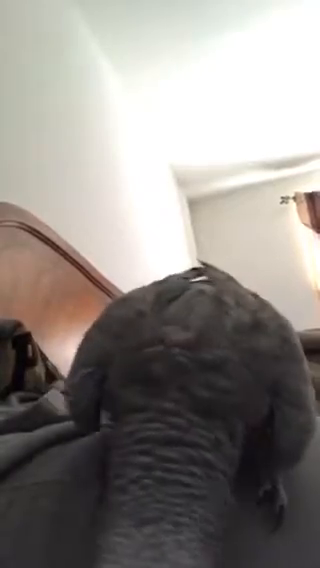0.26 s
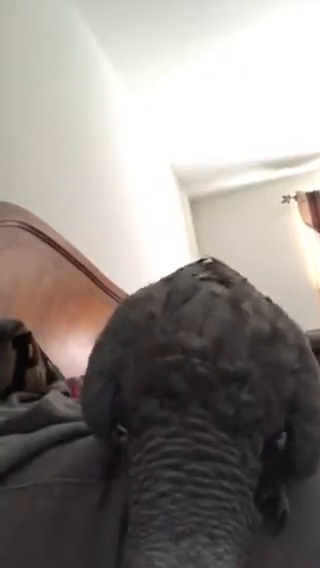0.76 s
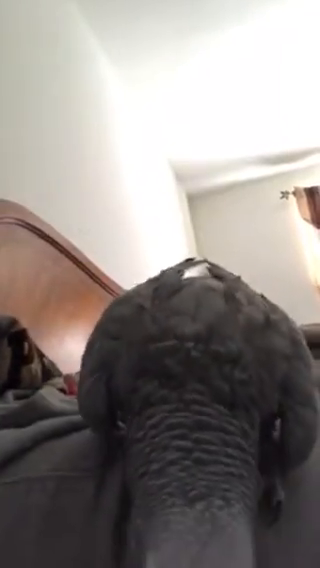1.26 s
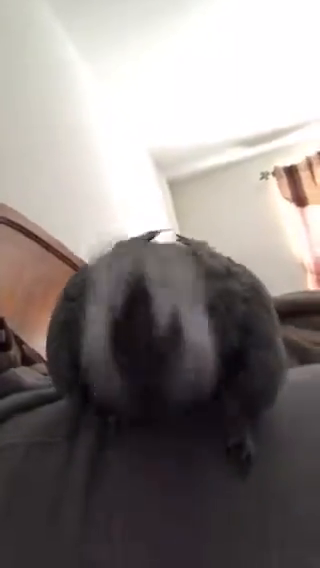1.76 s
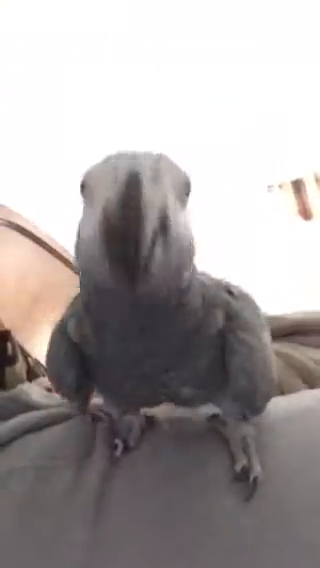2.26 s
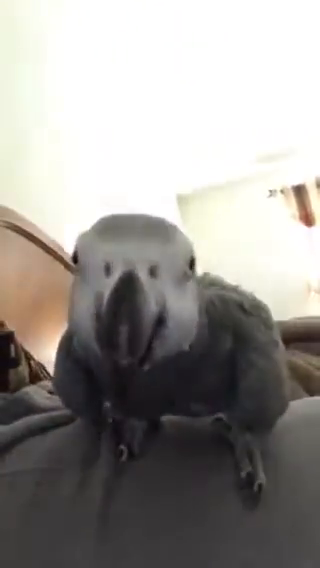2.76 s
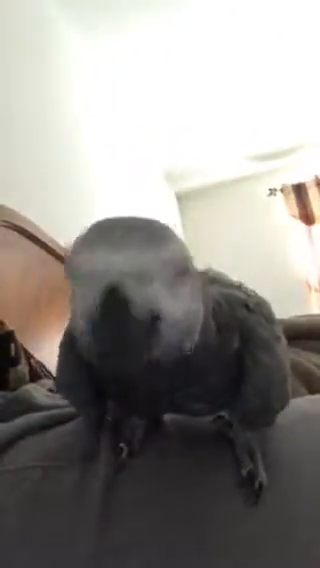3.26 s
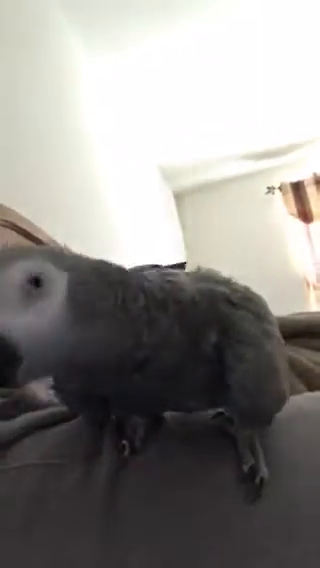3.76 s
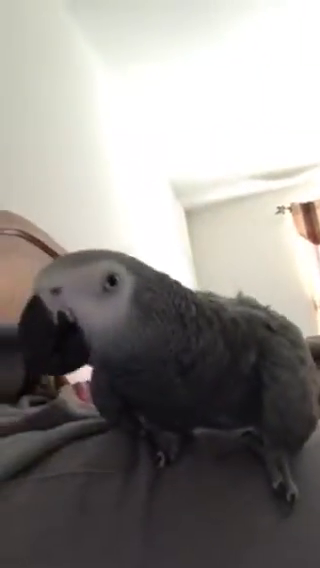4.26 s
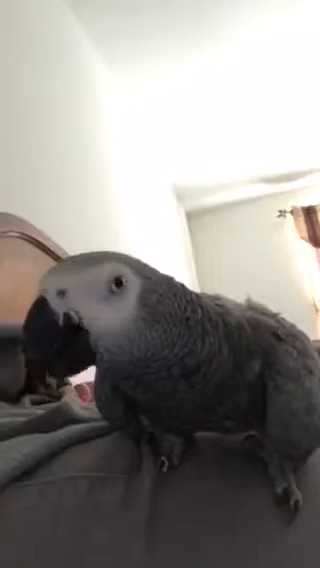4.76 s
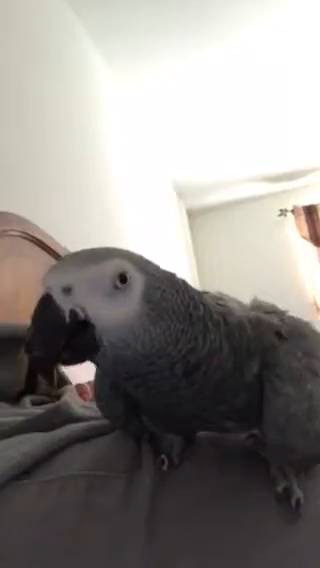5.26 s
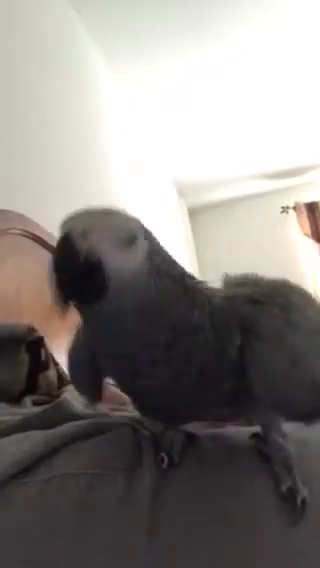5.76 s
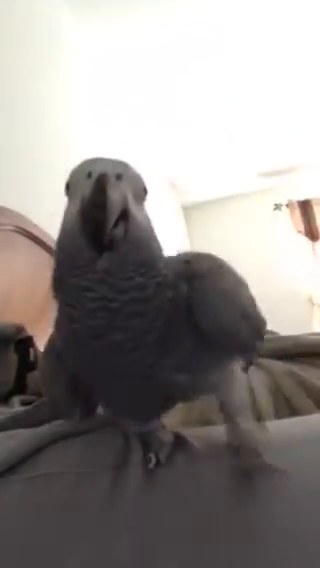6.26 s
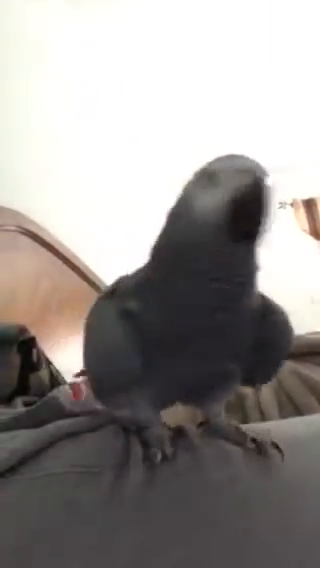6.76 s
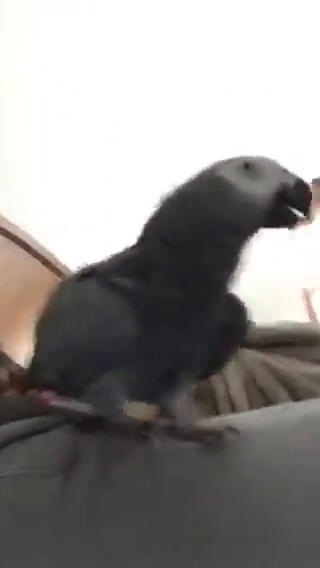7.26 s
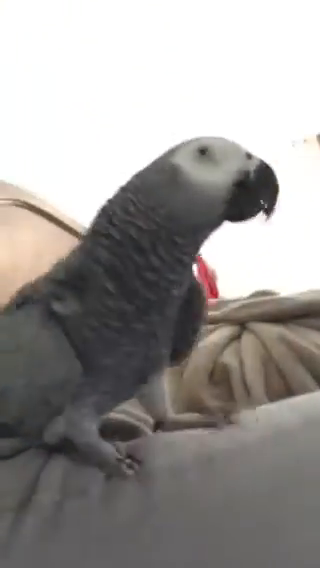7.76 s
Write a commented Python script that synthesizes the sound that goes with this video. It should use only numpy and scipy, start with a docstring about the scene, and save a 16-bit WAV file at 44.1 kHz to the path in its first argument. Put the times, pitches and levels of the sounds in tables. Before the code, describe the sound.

A parrot close to the microphone clicks its beak and tongue and makes tiny squeaky clucks, many ending in a little puff of hiss, with faint feather rustles. About halfway through comes a soft raspy chirp. Near the end one loud, short squawk falls in pitch, followed by a few faint clicks and clucks. Both calls ring slightly in the quiet bedroom.

```python
"""A grey parrot, close by in a bedroom, clicks its beak and tongue and makes tiny squeaky clucks.
The clucks are pulses from its voice box. Air builds up behind the tongue, so most runs of clucks end
in a puff of hiss. There are also feather rustles and two faint, short wet squeaks. Two calls ring
through the room, perhaps from a second bird further off: a soft raspy chirp and, near the end,
one loud falling squawk."""
import sys
import numpy as np
from scipy import signal
from scipy.fft import rfft, irfft, next_fast_len
from scipy.io import wavfile

SR = 44100
rng = np.random.default_rng(int(sys.argv[2]) if len(sys.argv) > 2 else 0)


def transcribe(u):
    """Save the signal u as a 16-bit wav file named by the first command-line argument.

    u: samples, shape (n,) or (channels, n), limited to [-1, 1]; the rate is SR.
    q: integer samples, one column per channel.
    """
    v = np.clip(np.atleast_2d(u).T, -1, 1)
    q = np.round(v * 32767).astype(np.int16)
    wavfile.write(sys.argv[1], SR, q)


N = 353682
TIME = np.arange(N) / SR
CUTOFF_HZ = 16100


def from_db(db):
    """Turn decibels into a number to multiply by."""
    return 10 ** (np.asarray(db) / 20)


def rms_one(x):
    """Scale a signal so its average strength (rms) is 1."""
    return x / np.sqrt(np.mean(x ** 2) + 1e-20)


def at_hz(points, hz):
    """Look up a frequency in a table, sliding between rows on a musical scale."""
    table = np.array(points)
    return np.interp(np.log(np.maximum(hz, 1)), np.log(table[:, 0]), table[:, 1])


def add(track, start_s, sound):
    """Mix a sound into a track at a given time."""
    at = max(round(start_s * SR), 0)
    track[at:at + len(sound)] += sound[:N - at]


def colour(x, spectrum):
    """Turn each frequency up or down as a table says."""
    size = next_fast_len(N + 2000)
    bins = rfft(x, size)
    return irfft(bins * from_db(at_hz(spectrum, np.arange(len(bins)) * SR / size)), size)[:N]


def noise(spectrum):
    """Steady noise with a given tone colour and strength 1."""
    return rms_one(colour(rng.standard_normal(N), spectrum))


def flutter(rate_hz):
    """A random wobble of strength 1, up to about the given speed."""
    smoothing = signal.butter(2, rate_hz, fs=SR, output="sos")
    return rms_one(signal.sosfilt(smoothing, rng.standard_normal(N)))


def resonate(x, hz, width_hz):
    """Make a sound ring at one frequency; a narrower width rings longer."""
    r = np.exp(-np.pi * width_hz / SR)
    feedback = [1, -2 * r * np.cos(2 * np.pi * hz / SR), r * r]
    return signal.lfilter(np.array([1, 0, -1]) * (1 - r * r) / 2, feedback, x)


def peak(hz, centre_hz, width_hz):
    """A bell shape that reaches 1 at its centre."""
    return 1 / (1 + ((hz - centre_hz) / width_hz) ** 2)


def arch(length_s, power, skew=1):
    """A swell that rises and falls; a skew below 1 makes it peak early."""
    progress = np.linspace(0, 1, round(length_s * SR))
    return np.abs(np.sin(np.pi * progress ** skew)) ** power


# The tone of the quiet room. Each row: frequency in Hz, relative level in dB.
BACKGROUND_COLOUR = [(15, -35.5), (25, -23.5), (40, -1.5), (53, -0.5), (166, -7.5), (195, -10.5), (242, -6),
                     (344, -13), (624, -19.5), (775, -18), (2990, -26.5), (3620, -28), (4740, -28.5),
                     (7920, -31), (11300, -37), (16000, -33.5)]

def background(level_db=-67.5):
    """A faint, low rush fills the bedroom the whole time."""
    return from_db(level_db) * noise(BACKGROUND_COLOUR)


# Beak and tongue clicks. Each row: start in seconds, ring level in dB, beak ring in Hz,
# mouth pop in Hz, snap level in dB.
CLICKS = [(0.1402, -50, 980, 810, -53), (0.211, -50, 1120, 1050, -61), (0.3755, -46.5, 1220, 380, -49),
          (0.6546, -44, 1100, 717, -57.5), (0.948, -55.5, 1720, 368, -58.5), (1.11, -56, 1730, 280, -58),
          (1.5546, -54, 2300, 420, -73), (1.794, -51, 1040, 724, -54.5), (1.9597, -79, 3190, 950, -52),
          (2.0317, -53, 2230, 650, -62), (2.0688, -52.5, 1121, 950, -54), (2.2703, -64, 1670, 1310, -64.5),
          (2.419, -72, 1700, 1300, -68), (2.4656, -52.5, 1600, 1480, -50.5), (2.656, -64.5, 1150, 950, -63),
          (2.7355, -44, 2980, 900, -46.5), (3.0088, -65, 3000, 720, -61), (3.282, -61, 1470, 950, -60),
          (3.5519, -54, 1170, 770, -84), (3.7408, -69, 1200, 540, -64), (4.14, -62.5, 2490, 950, -67),
          (4.4566, -46.5, 2570, 870, -58), (4.773, -47.5, 2340, 850, -75), (5.1957, -45, 2090, 970, -48.5),
          (5.5501, -58, 1090, 990, -61.5), (6.844, -58.5, 1050, 860, -77), (7.4698, -56.5, 1840, 940, -67),
          (7.9379, -56.5, 1170, 294, -70)]
# The high notes in the beak's hard snap. Each row: frequency in Hz, width in Hz, relative level in dB.
SNAP_NOTES = [(3500, 1100, -3), (6700, 1000, 0), (11000, 4000, -8)]

def clicks(beak_cutoff_hz=7600, leak_share=0.35):
    """The tongue lets go: the beak snaps and rings, and the mouth pops a little longer."""
    out, kick = np.zeros(N), signal.unit_impulse(SR // 25)
    scale = np.sqrt(0.004 * SR / len(kick))   # levels count as if each click lasted 4 ms

    def struck(hz, width_hz):
        return rms_one(resonate(resonate(kick, hz, width_hz), hz, 2 * hz))

    for start, ring_db, ring_hz, pop_hz, snap_db in CLICKS:
        pop = struck(pop_hz, width_hz=90)
        pop_db = ring_db - 2.5 - 3.5 * np.log2(pop_hz / 328)   # a roomier mouth pops harder
        crack = struck(2100, width_hz=1900)
        # the tongue sits differently each time, which moves a hollow note
        hollow_hz = 1900 * from_db(rng.normal(0, 1.5))
        hollow = rms_one(resonate(kick, hollow_hz, width_hz=350))
        ring = rms_one(struck(ring_hz, width_hz=420) + 0.42 * crack + 0.46 * hollow)
        snap = 0
        for hz, width, db in SNAP_NOTES:
            note = resonate(resonate(kick, hz, width), hz, 2 * width)
            snap += from_db(db + rng.normal(0, 3.2)) * note
        click = from_db(pop_db) * pop + from_db(ring_db) * ring + from_db(snap_db) * rms_one(snap)
        add(out, start, scale * click)
    # the closed beak lets only part of the highest treble out
    muffled = signal.sosfilt(signal.butter(8, beak_cutoff_hz, fs=SR, output="sos"), out)
    return (1 - leak_share) * muffled + leak_share * np.roll(out, 5)


# Low clucks. Each row: start in seconds, length in seconds, pitch in Hz, level of the base note in dB,
# level of the overtones (the higher notes above it) in dB.
GRUNTS = [(0.15, 0.017, 540, -58, -62), (0.164, 0.016, 690, -49, -72.5), (0.412, 0.039, 299, -55, -70),
          (3.614, .048, 439, -53, -57), (3.9, 0.045, 583, -50.5, -55), (4.455, .1, 619.5, -52.5, -55.5),
          (5.119, .027, 361, -76, -54.5), (5.15, 0.049, 392, -69, -56), (5.613, 0.021, 375, -76, -58.5),
          (7.016, 0.042, 301.4, -51, -66)]

def grunts(bend=(0.93, 0.97, 0.88), bright_db=-15):
    """A grunt holds a nearly level note; the bend multiplies its start, middle and end pitch."""
    for start, length, hz, base_db, overtone_db in GRUNTS:
        yield start, length, hz * np.array(bend), base_db, overtone_db, bright_db


# Falling clucks. Each row: start in seconds, length in seconds, middle pitch in Hz, end pitch in Hz,
# level in dB, brightness in dB.
GULPS = [(1.562, 0.035, 403, 190, -50.5, -14.5), (2.039, 0.023, 394, 195, -54.5, -6.5),
         (2.542, 0.031, 490.4, 170, -45, -11.5), (2.813, .023, 736, 385, -43, -1.5),
         (3.078, .026, 802, 463, -41, -12.5), (3.34, .025, 601, 312, -45.5, -9),
         (3.929, .025, 386, 239, -53, -9), (4.254, .027, 410, 275, -48.5, -15),
         (4.519, .056, 535.5, 383, -49, -7), (4.875, .035, 515, 200, -46.5, -16),
         (5.711, .021, 586, 372, -46.5, -1.5), (5.927, .03, 489, 360, -52, -4.5),
         (6.197, 0.021, 560, 476, -58, 3)]

def gulps():
    """A gulp plunges in pitch; deeper gulps have weaker overtones."""
    for start, length, hz, end_hz, base_db, bright_db in GULPS:
        overtone_db = base_db - 4.5 + 4 * np.log2(hz / 570)
        yield start, length, (1.38 * hz, hz, end_hz), base_db, overtone_db, bright_db


# High clucks. Each row: start in seconds, length in seconds, pitch in Hz, level in dB, brightness in dB.
PEEPS = [(2.523, 0.019, 790, -50, -16), (2.765, .024, 674, -42, -2.5), (2.794, .023, 765, -44.5, 0),
         (3.055, .021, 774, -41.5, -11), (3.322, 0.018, 667, -42.5, -12.5), (4.22, 0.02, 684, -45.5, -12.5),
         (5.431, 0.018, 870, -47.5, -10.5), (5.678, .016, 830, -43.5, -0.5), (5.902, .019, 749, -44, -9.5),
         (6.138, 0.021, 708, -43, -9), (6.173, .021, 710, -45.5, -4), (6.37, .022, 750, -44, -16),
         (6.403, 0.03, 740, -43, -7.5), (6.442, 0.027, 727, -42.5, -2), (6.687, 0.019, 849, -36, -1),
         (6.721, .03, 1047, -54.5, -1), (7.256, 0.023, 822, -46.5, -13), (7.502, .021, 700, -58, -13),
         (7.566, .02, 778, -46, -16)]

def peeps(bend=(1.12, 0.99, 1.333)):
    """A peep dips in pitch, then flicks upwards."""
    for start, length, hz, base_db, bright_db in PEEPS:
        yield start, length, hz * np.array(bend), base_db, base_db - 4.5, bright_db


# How the mouth colours overtones and breath. Each row: frequency in Hz, relative level in dB.
MOUTH_COLOUR = [(400, 2.5), (1400, -4.5), (2300, -3.5), (3600, 2), (5000, -19.5), (6700, -5.5), (8200, -24),
                (15000, -32)]
BREATH_COLOUR = [(300, -18.5), (1000, 5), (2400, 2), (3900, 4), (5300, -0.5), (6700, 6.5), (8500, -16.5),
                 (16000, -33.5)]

def clucks(shapes, jitter=0.019, wander=0.035, rasp=0.078, croak_below_hz=650):
    """Each grunt, gulp or peep is a short run of voice box pulses whose pitch bends along one arc."""
    out, wobble, shake = np.zeros(N), flutter(660), flutter(430)
    breath, waver = noise(BREATH_COLOUR), flutter(45)
    harmonic = np.arange(1, 25)[:, None]
    for start, length, (start_hz, middle_hz, end_hz), base_db, overtone_db, bright_db in shapes:
        progress = np.linspace(0, 1, round(length * SR))
        span = round(start * SR) + np.arange(len(progress))
        arc = np.polyval(np.polyfit([0, 0.5, 1], [start_hz, middle_hz, end_hz], 2), progress)
        # at low pitch the voice box is slack and beats unevenly
        croak = np.clip(2 * (1 - arc / croak_below_hz), 0, 1)
        pitch = arc * (1 + jitter * (1 + 2 * croak) * wobble[span])
        pitch *= 1 + wander * croak * waver[span]
        phase = 2 * np.pi * np.cumsum(pitch) / SR
        hz = harmonic * arc
        # an open beak lets the upper overtones out; the tongue boosts those near twice the pitch
        beak_db = bright_db * np.interp(hz, [2300, 3200], [0, 1])
        tongue_db = 7 * peak(hz, 2.05 * middle_hz, width_hz=260)
        level_db = overtone_db + at_hz(MOUTH_COLOUR, hz) + beak_db + tongue_db + 4 * croak * shake[span]
        # the throat boosts a low base note; a little higher lies a weak spot
        level_db[0] = base_db + 8 * peak(arc, 310, width_hz=90)
        level_db -= 9 * peak(hz, 515, width_hz=50)
        # the throat delays each overtone differently
        lag = np.cumsum(rng.normal(0.5, 0.8, harmonic.shape), axis=0)
        tone = np.sum(from_db(level_db) * (hz < CUTOFF_HZ) * np.cos(harmonic * phase - lag), axis=0)
        rush = rasp * from_db(overtone_db) * breath[span] * (1 + np.cos(phase))
        # a falling cluck is let go suddenly, so it peaks early
        fall = np.clip(1 - end_hz / start_hz, 0, 1)
        add(out, start, (tone + rush) * arch(length, 0.73, skew=np.exp(-0.2 * fall)))
    return out


# The thin, high sizzle of escaping air. Each row: frequency in Hz, relative level in dB.
SIZZLE_COLOUR = [(5000, -20), (8000, 0), (10000, -2), (11800, 7.5), (14000, -3), (16000, -8)]

def air_leak(shapes, lead_s=0.019, sputter_db=2.5):
    """Air squeezes past the tongue as pressure builds for each cluck; the nearest puff sets its level."""
    strength = np.zeros(N)
    for start, length, *_ in shapes:
        leak_db = min(PUFFS, key=lambda puff: abs(puff[0] - start))[-1]
        swell = arch(length + lead_s, 1.1)
        add(strength, start - lead_s, from_db(leak_db) * swell * np.linspace(0, 2, len(swell)))
    return strength * rms_one(noise(SIZZLE_COLOUR) * from_db(sputter_db * flutter(300)))


# Puffs that end the runs of clucks. Each row: start in seconds, length in seconds, hiss level in dB,
# sizzle level in dB, level in dB of the air that leaks during nearby clucks.
PUFFS = [(0.183, 0.055, -63.5, -63, -75), (0.433, .038, -63.5, -78, -59), (1.267, 0.04, -62.5, -74, -80),
         (1.593, 0.021, -57, -68, -59.5), (1.865, .027, -72, -71, -80), (2.061, .014, -55, -68, -61),
         (2.558, .028, -54, -57.5, -82), (2.824, .04, -48.5, -55, -82), (3.094, 0.042, -52.5, -54, -73),
         (3.349, 0.047, -55, -52, -66), (3.65, 0.034, -57, -50.5, -52.5), (3.94, .04, -57, -56.5, -63),
         (4.258, 0.022, -66, -60.5, -68), (4.535, .061, -54, -55, -75), (4.892, .028, -72, -63, -69),
         (5.182, 0.029, -58.5, -60, -51.5), (5.609, .028, -60.5, -76, -72.5),
         (5.717, .038, -53.5, -63.5, -71), (5.949, .044, -59, -62.5, -56), (6.209, 0.03, -53, -61.5, -62.5),
         (6.443, 0.077, -46.5, -51.5, -68), (6.703, 0.069, -61.5, -66, -68), (6.76, .04, -57, -61, -72),
         (7.272, .078, -55.5, -56, -53.5), (7.52, 0.16, -70.5, -65.5, -63), (7.857, 0.033, -63.5, -70, -80)]

def puffs(sputter_db=2.5, throat_hz=3890):
    """Air sputters out as the beak opens and the throat rings; the sizzle peaks before the hiss."""
    out = np.zeros(N)
    sputter = rms_one(from_db(sputter_db * flutter(300)))
    breath = noise(BREATH_COLOUR)
    hiss = sputter * rms_one(breath + 0.67 * resonate(breath, throat_hz, width_hz=410))
    sizzle = sputter * noise(SIZZLE_COLOUR)
    for start, length, hiss_db, sizzle_db, _ in PUFFS:
        span = round(start * SR) + np.arange(round(length * SR))
        add(out, start, from_db(hiss_db) * rms_one(arch(length, 1.1, skew=0.71)) * hiss[span])
        add(out, start, from_db(sizzle_db) * rms_one(arch(length, 1.1, skew=0.41)) * sizzle[span])
    return out


# Feather rustles, plus two faint, short wet squeaks at 5.088 and 5.457 seconds.
# Each row: start in seconds, length in seconds, level in dB, centre in Hz.
RUSTLES_AND_SQUEAKS = [(0.37, 0.085, -64, 6700), (1.063, .15, -69, 11000), (1.233, 0.043, -52, 10300),
                       (2.21, 0.064, -72, 11800), (2.29, .095, -69, 6000), (3.848, .072, -66, 11200),
                       (4.816, .06, -68, 6900), (5.088, .014, -58, 14000), (5.457, .028, -69, 3800),
                       (6.347, 0.16, -59.5, 4900), (6.815, 0.1, -65.5, 3250), (7.7, .22, -68.5, 9840)]
# The tone of the grainy noise they share. Each row: frequency in Hz, relative level in dB.
GRAIN_COLOUR = [(600, -23.5), (1500, 4), (4000, -4), (9500, -3), (16000, -1.5)]

def rustles_and_squeaks():
    """Feather rustles and two faint wet squeaks, each a short swell of grainy noise."""
    out = np.zeros(N)
    grains = noise(GRAIN_COLOUR) * from_db(4 * flutter(250))
    for start, length, level_db, hz in RUSTLES_AND_SQUEAKS:
        swell = arch(length, 0.77)
        band = resonate(grains[round(start * SR):][:len(swell)], hz, width_hz=0.36 * hz)
        add(out, start, from_db(level_db) * swell * rms_one(band))
    return out


def call(course, throat, jitter, shimmer_db, rasp_db, dulling):
    """A shrill voice shaped by the throat; roughness shakes its pitch and its loudness."""
    times, *columns = np.transpose(course)
    pitch, level_db, roughness = (np.interp(TIME, times, column) for column in columns)
    span = (TIME > times[0]) & (TIME < times[-1])
    shaky_pitch = pitch * (1 + jitter * roughness * flutter(600))
    phase = 2 * np.pi * np.cumsum(shaky_pitch[span]) / SR
    harmonic = np.arange(1, 9)[:, None]
    # less effort makes the voice duller
    tilt_db = dulling * (harmonic - 4) * (level_db[span] - level_db.max())
    strengths = from_db(tilt_db) * (harmonic * pitch[span] < CUTOFF_HZ)
    voice = from_db(rasp_db) * rng.standard_normal(N) * span
    voice[span] += np.sum(strengths * np.sin(harmonic * phase), axis=0)
    shake_db = shimmer_db * roughness * np.tanh(flutter(220))
    return colour(voice * from_db(level_db + shake_db), throat)


# The chirp's path. Each row: time in seconds, pitch in Hz, level in dB, roughness from 0 to 1.
CHIRP_COURSE = [(4.272, 2040, -60, .05), (4.312, 1840, -51.5, 0.24), (4.335, 2210, -50, 0.98),
                (4.362, 2734, -37, 0), (4.388, 2660, -57, .7), (4.435, 2280, -49, 1),
                (4.475, 2726, -44, 0.59), (4.525, 2484, -53, .85), (4.555, 2254, -63, .9)]
# How the throat colours the chirp. Each row: frequency in Hz, level change in dB.
CHIRP_THROAT = [(1450, -22), (1850, -5.5), (2300, -6.5), (2780, 0), (3150, -20), (3800, -7.5), (4400, -17),
                (5300, -26), (8000, -29), (12000, -47)]

def chirp():
    """A soft, raspy call starts low and clean, then breaks upwards and swells twice."""
    return call(CHIRP_COURSE, CHIRP_THROAT, jitter=0.124, shimmer_db=9.5, rasp_db=-7, dulling=0.07)


def breath_catch(start_s=6.938, length_s=0.074, level_db=-55.5):
    """Air rasps briefly before the squawk takes hold."""
    strength = np.zeros(N)
    add(strength, start_s, from_db(level_db) * arch(length_s, 0.17))
    air = noise([(800, -10), (1600, -0.5), (3600, -5), (5500, -21.5), (9000, -17.5), (16000, -30)])
    return strength * air


# How the throat colours the squawk. Each row: frequency in Hz, level change in dB.
SQUAWK_THROAT = [(1400, -31.5), (1850, -12), (2480, -4.5), (2800, -6.5), (3350, -3), (3900, 0.5),
                 (4900, -4), (5300, -12.5), (6100, -8), (7400, -13.5), (9700, -12.5), (10400, -19),
                 (12200, -20), (15500, -37.5)]

def squawk(start_s=6.965, length_s=0.13, attack_s=0.014, release_s=0.007, top_hz=2491, end_hz=1892):
    """One loud push of air bursts in near its top pitch, swells, then sinks and grows rough."""
    t = np.linspace(0, length_s + 5 * release_s, 200)[1:]
    sunk = (1 + np.tanh((t - 0.073) / 0.036)) / 2   # halfway down after 0.073 seconds
    scoop_hz = 501 * np.exp(-t / 0.004)   # the quick rise into the note
    pitch = top_hz + (end_hz - top_hz) * sunk - scoop_hz
    effort = (1 - np.exp(-t / attack_s)) * np.exp(-np.maximum(t - length_s, 0) / release_s)
    tiring_db = 50 * np.maximum(t - 0.064, 0)   # it weakens as it sinks
    level_db = -21 + 20 * np.log10(effort) - tiring_db
    roughness = 0.16 + 2.3 * t
    course = np.column_stack([start_s + t, pitch, level_db, roughness])
    return call(course, SQUAWK_THROAT, jitter=0.072, shimmer_db=13.5, rasp_db=-16.5, dulling=0.18)


# How long the bedroom rings. Each row: frequency in Hz, seconds for an echo to fade by 60 dB.
ECHO_FADE = [(300, 0.23), (2000, 0.45), (4000, 0.44), (8000, 0.36), (14000, 0.12)]

def room_echoes(x, first_echo_s=0.0019, build_s=0.0018):
    """Echoes from walls and ceiling blur together; the highest treble dies first."""
    t = np.arange(SR * 3 // 4) / SR
    edges_hz, tail = np.geomspace(150, 17000, 9), 0
    for low, high in zip(edges_hz, edges_hz[1:]):
        band_filter = signal.butter(2, [low, high], "band", fs=SR, output="sos")
        band = signal.sosfilt(band_filter, rng.standard_normal(len(t)))
        tail += band * from_db(-60 * t / at_hz(ECHO_FADE, np.sqrt(low * high)))
    tail *= np.clip((t - first_echo_s) / build_s, 0, 1)
    return signal.fftconvolve(x, tail / np.sqrt(np.sum(tail ** 2)))[:N]


def scene():
    """The nearby parrot has almost no echo; the two calls fill the room."""
    shapes = [*peeps(), *gulps(), *grunts()]
    near = clicks() + clucks(shapes) + air_leak(shapes) + puffs() + rustles_and_squeaks()
    far = squawk() + chirp() + breath_catch()
    echoes = room_echoes(from_db(-26.5) * near + from_db(-5.5) * far)
    return (near + far + echoes + background())[None]


def record(dry):
    """Cut away the very highest treble."""
    return signal.sosfilt(signal.ellip(10, 0.2, 70, CUTOFF_HZ, fs=SR, output="sos"), dry)


dry = scene()
out = record(dry)
transcribe(out)
```